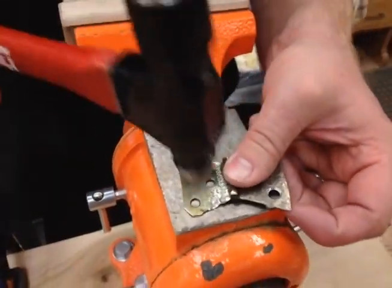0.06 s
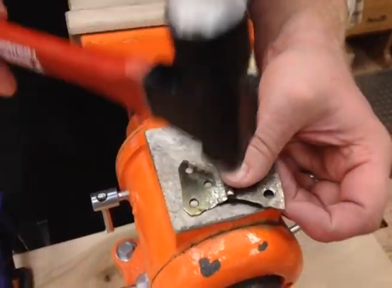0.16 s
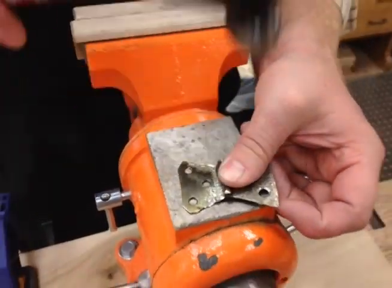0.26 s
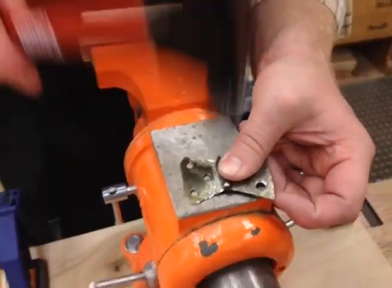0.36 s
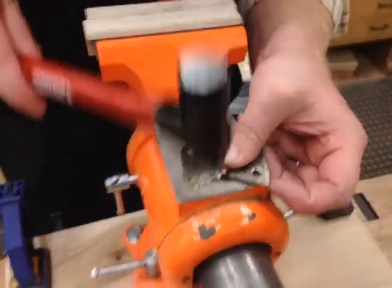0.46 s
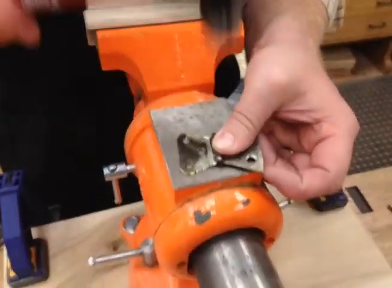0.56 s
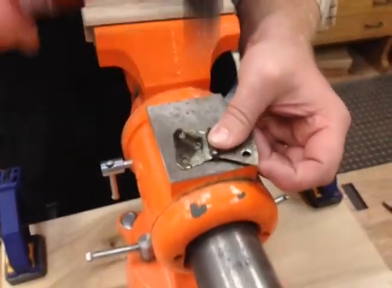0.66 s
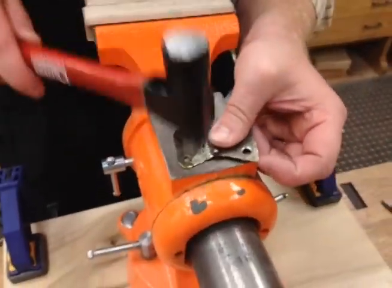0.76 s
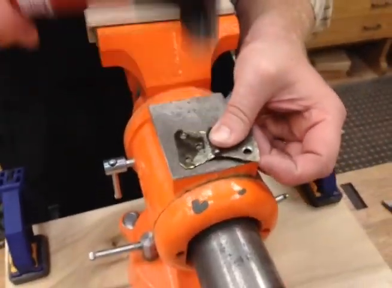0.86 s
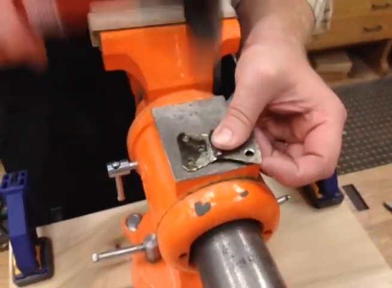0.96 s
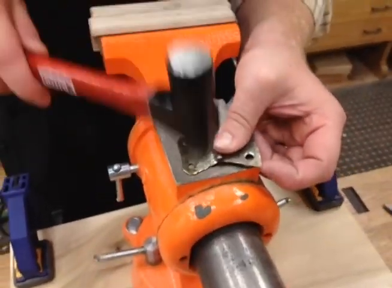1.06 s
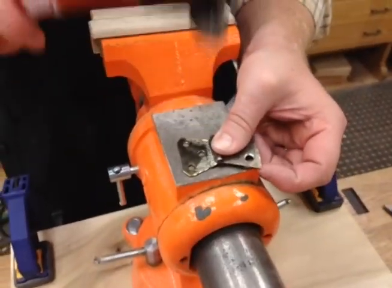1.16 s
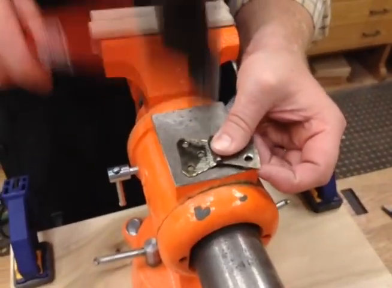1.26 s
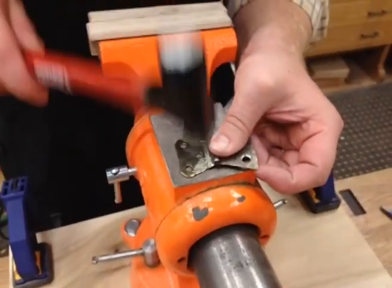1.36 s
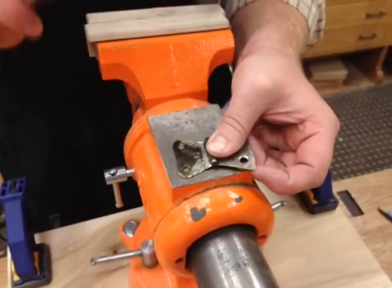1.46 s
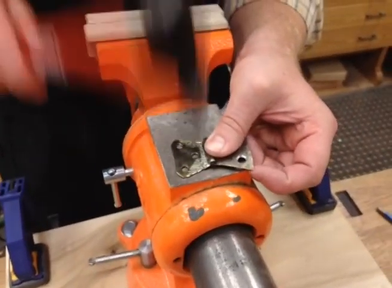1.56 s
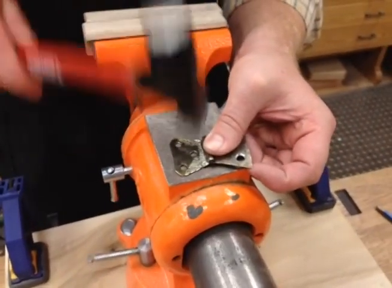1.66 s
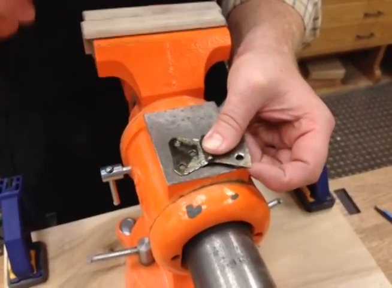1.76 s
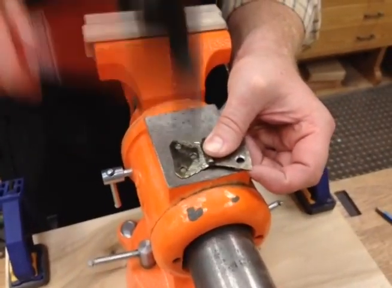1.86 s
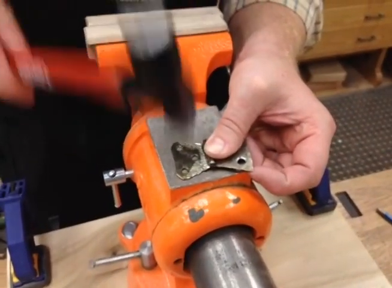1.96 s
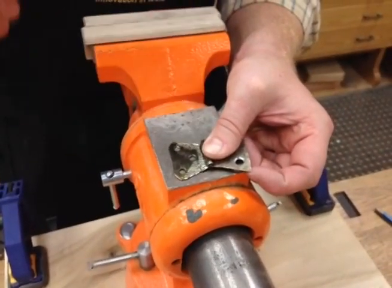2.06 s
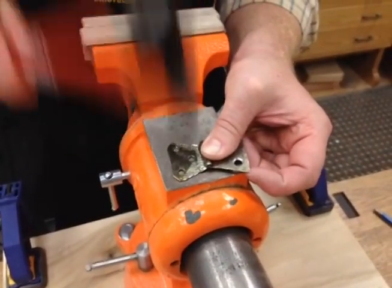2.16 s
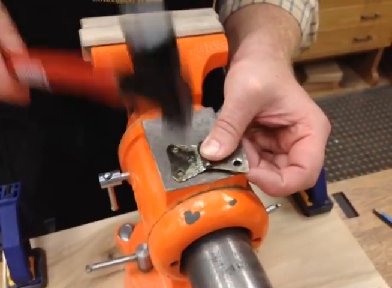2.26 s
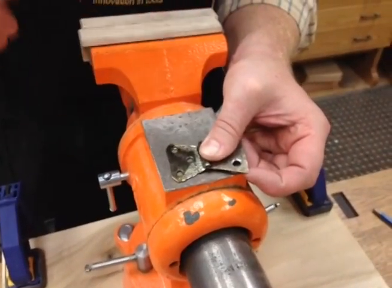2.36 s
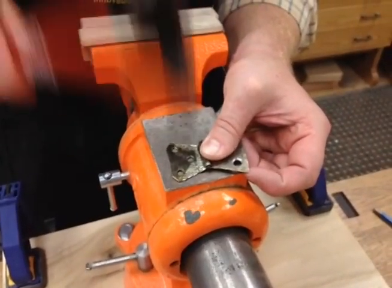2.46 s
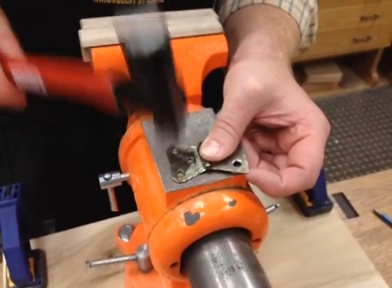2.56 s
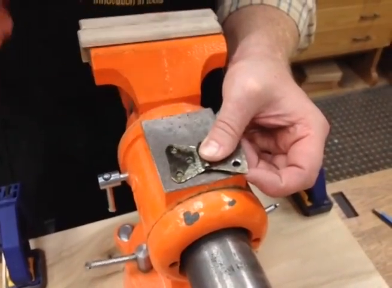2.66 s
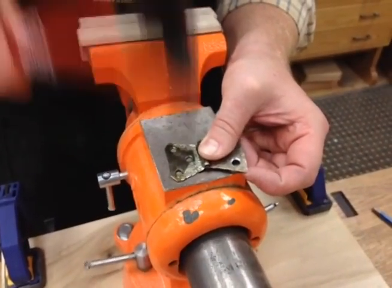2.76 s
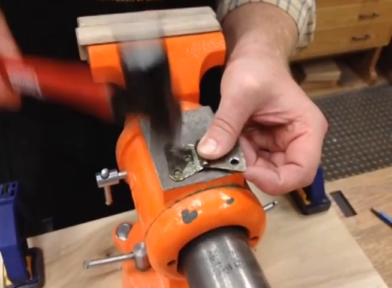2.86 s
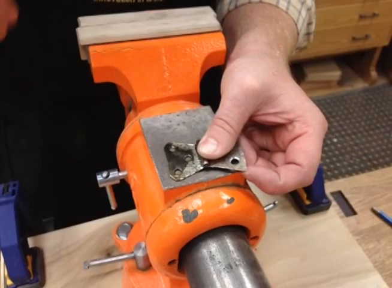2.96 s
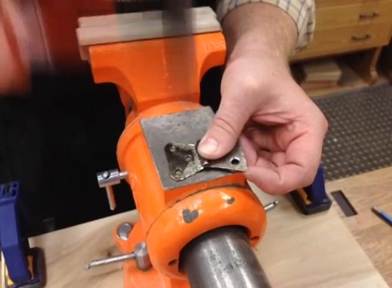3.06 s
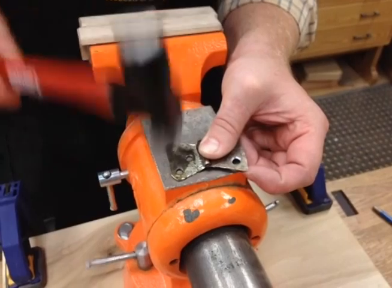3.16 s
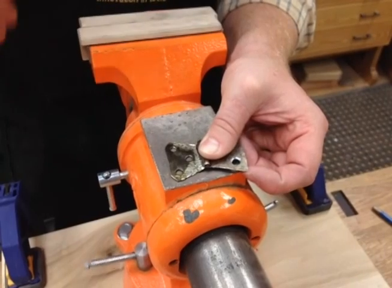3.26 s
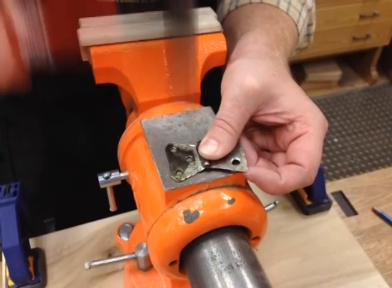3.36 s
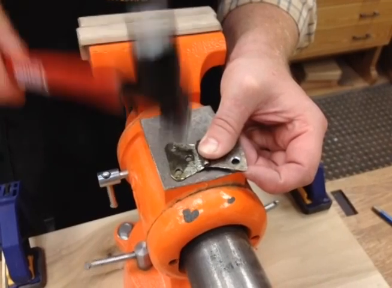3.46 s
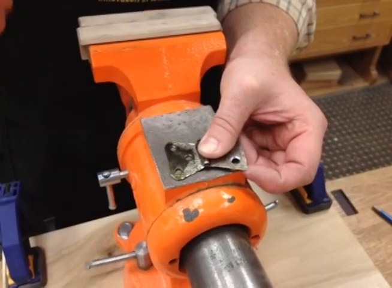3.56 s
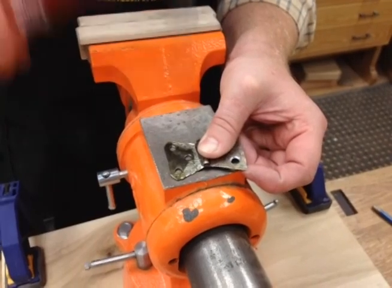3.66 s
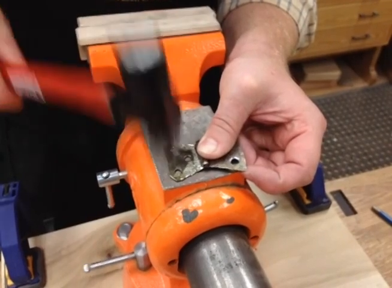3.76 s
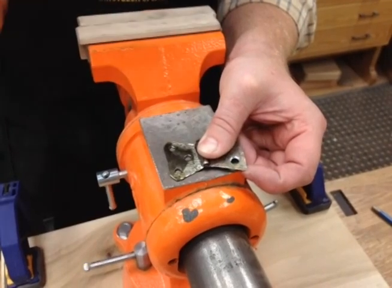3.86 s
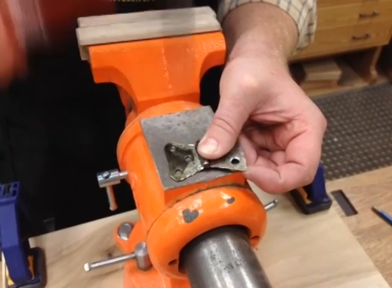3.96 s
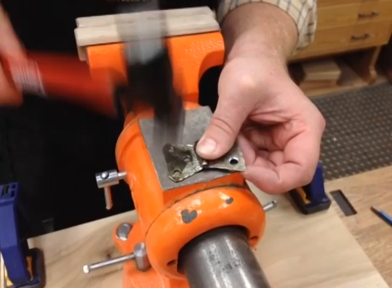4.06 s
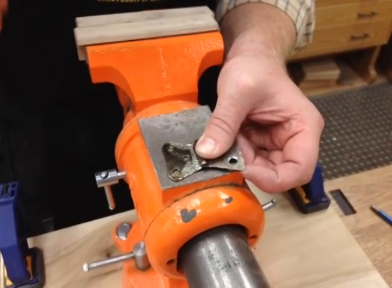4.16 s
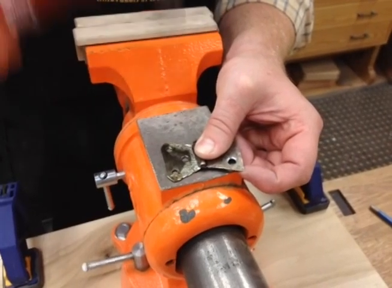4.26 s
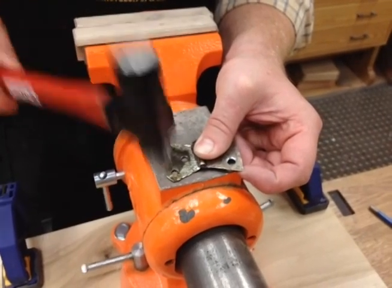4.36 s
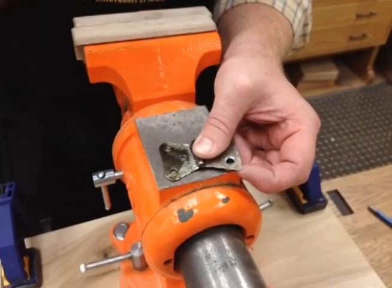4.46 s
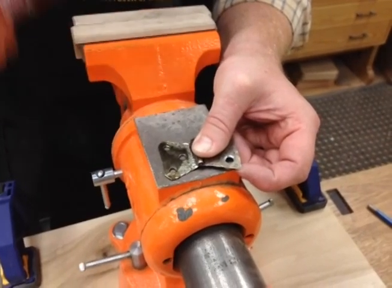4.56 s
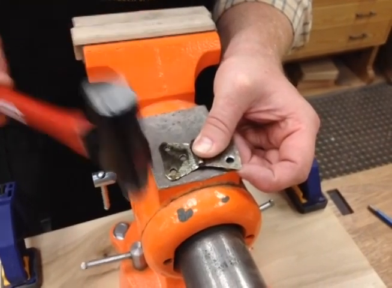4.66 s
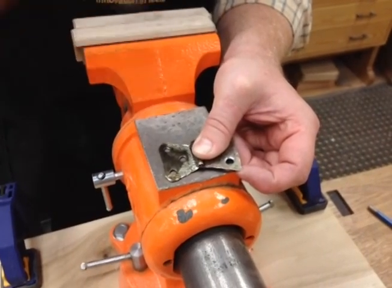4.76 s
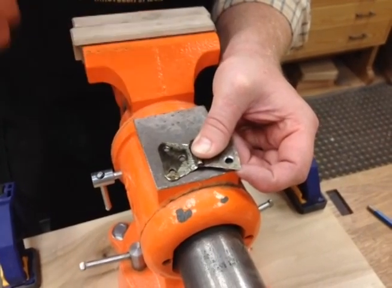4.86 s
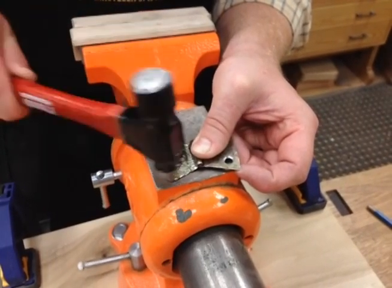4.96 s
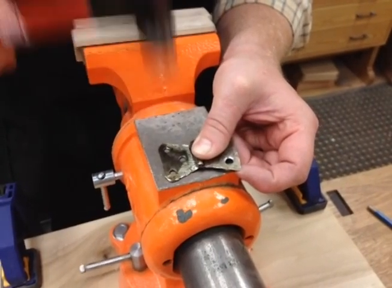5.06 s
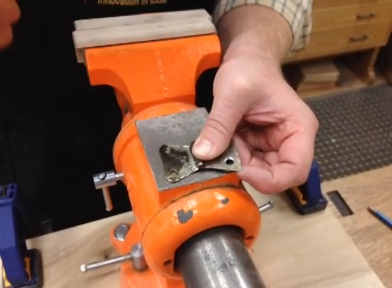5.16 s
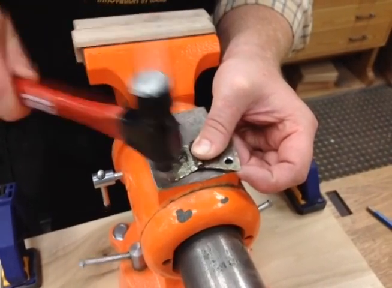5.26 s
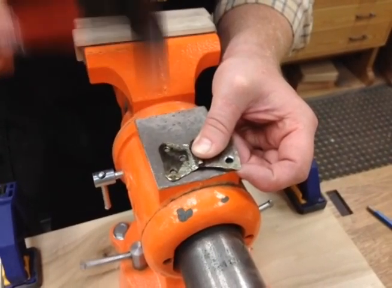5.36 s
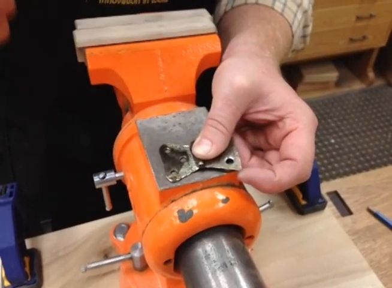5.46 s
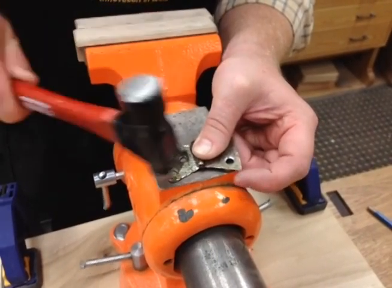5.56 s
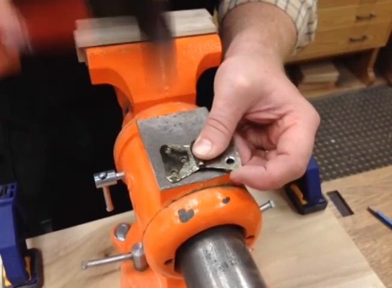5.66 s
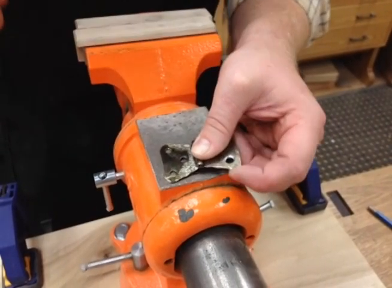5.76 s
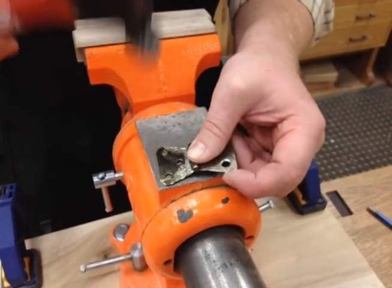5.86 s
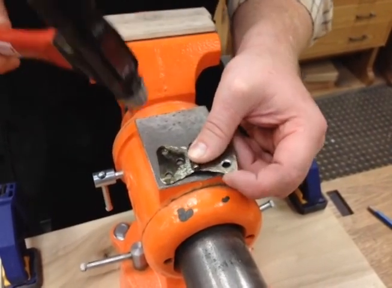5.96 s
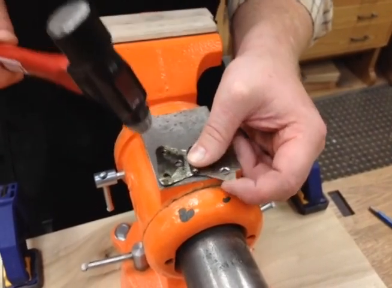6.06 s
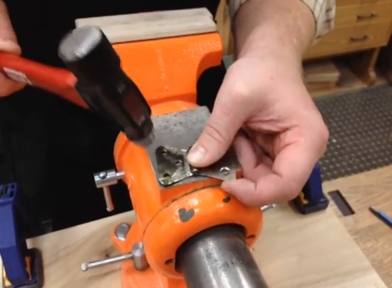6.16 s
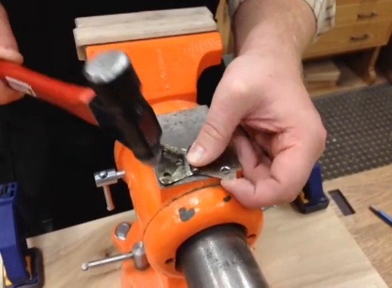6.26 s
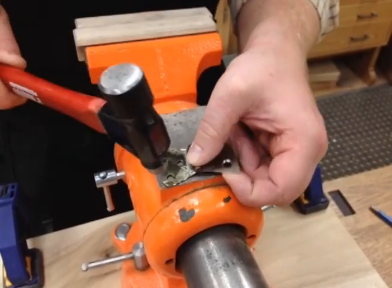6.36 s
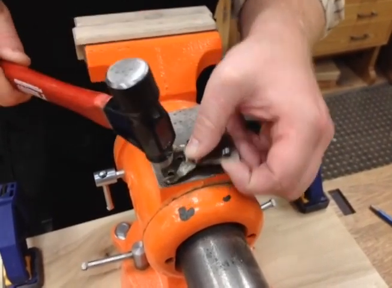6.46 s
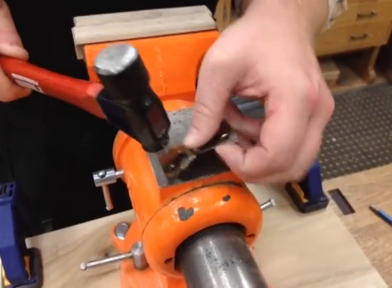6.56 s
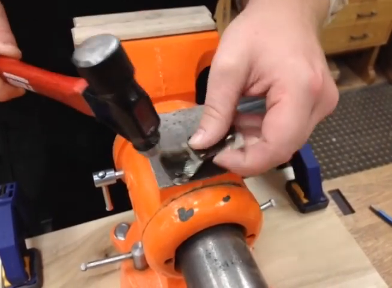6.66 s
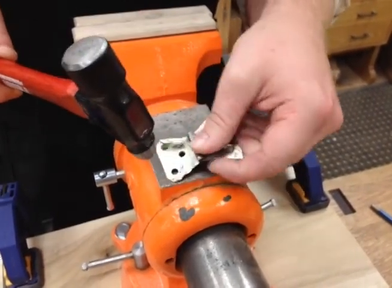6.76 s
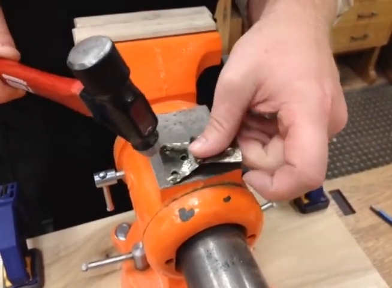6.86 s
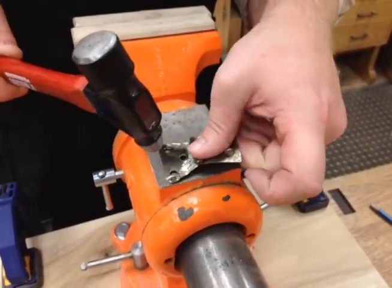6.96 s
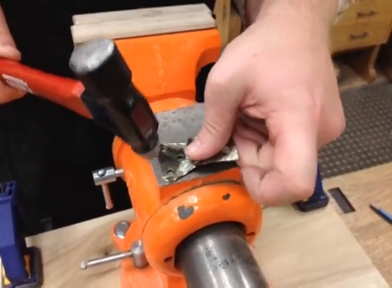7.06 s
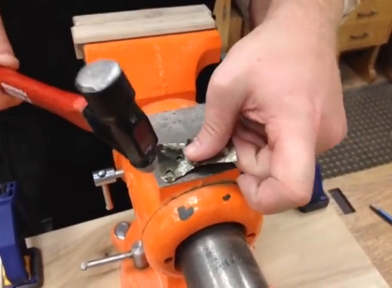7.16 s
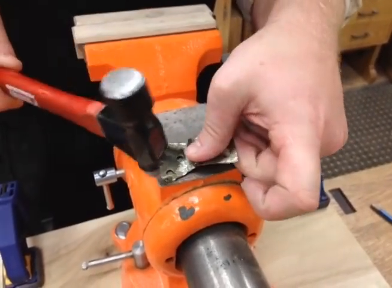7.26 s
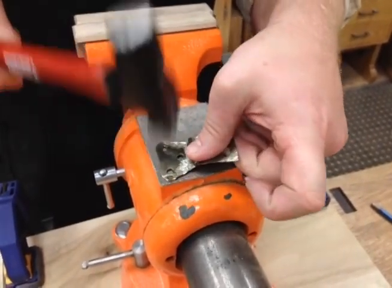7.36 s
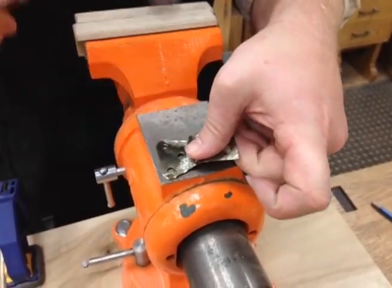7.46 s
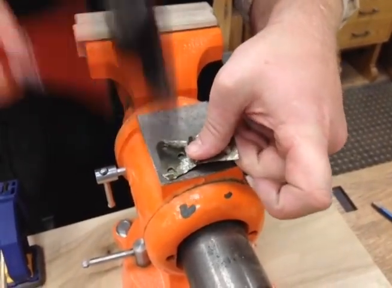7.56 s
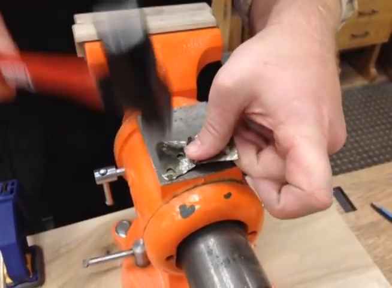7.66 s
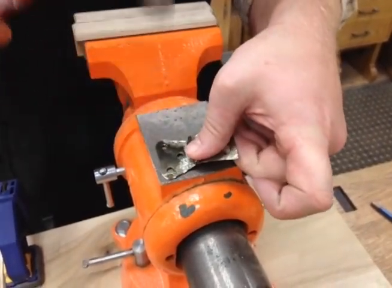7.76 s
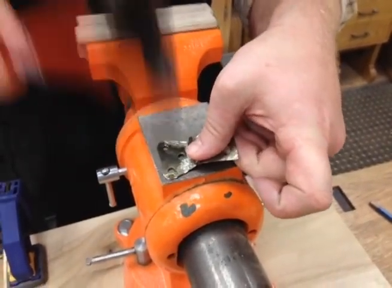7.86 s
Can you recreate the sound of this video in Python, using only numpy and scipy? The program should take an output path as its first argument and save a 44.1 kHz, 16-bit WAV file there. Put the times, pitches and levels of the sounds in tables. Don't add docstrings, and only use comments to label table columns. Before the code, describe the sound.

Steady, very loud hammer blows crack a small brass hinge against a vise anvil, rattling casting and bench, then a pause, scrape, click and one more blow.

```python
import sys
import numpy as np
from scipy import signal
from scipy.fft import rfft, irfft, next_fast_len
from scipy.io import wavfile
from scipy.ndimage import uniform_filter1d, map_coordinates

SR = 44100
rng = np.random.default_rng(int(sys.argv[2]) if len(sys.argv) > 2 else 0)


def nominal_scale(level):
    x = np.asarray(level, float) / 20
    return 10 ** x


def unload_audio(sound):
    columns = np.transpose(np.atleast_2d(sound))
    steps = np.round(np.clip(columns, -1, 1) * 32767)
    wavfile.write(sys.argv[1], SR, steps.astype(np.int16))


N = 349713

# (frequency [Hz], width [Hz], level [dB])
VISE_MODES = [(762, 90, -4.5), (1251, 160, 3), (1435, 270, -2.5), (1727, 59, -8), (2133, 45, 1.5),
              (2323, 65, 1.5), (2913, 180, -1), (3334, 150, -15.5), (3621, 160, 0), (4200, 200, -12.5),
              (4768, 360, -8), (5113, 130, -8), (5790, 200, -8), (8120, 580, -15.5), (10960, 1100, -21)]
REST_S = 6.105
MIC_TOP_HZ = 15350


def along(points, hz):
    f, v = np.transpose(points)
    return np.interp(np.log(hz + 1), np.log(f + 1), v)


def unit(x):
    return x / np.sqrt(np.mean(x ** 2) + 1e-20)


def filtered(x, response):
    m = 2 * next_fast_len(len(x) // 2 + 4096)
    return irfft(rfft(x, m) * response(np.fft.rfftfreq(m, 1 / SR)), m)[:len(x)]


def causal(gain):
    def response(hz):
        c = irfft(np.log(gain(hz) + 1e-6))
        half = len(c) // 2
        folded = np.r_[c[0], 2 * c[1:half], np.zeros(len(c) - half)]
        return np.exp(rfft(folded, 2 * len(hz) - 2))
    return response


def low_cut(hz, corner_hz, order):
    return (1j * hz / (corner_hz + 1j * hz)) ** order


def body(modes, scatter_db=0):
    luck = nominal_scale(scatter_db * rng.standard_normal(len(modes)))

    def response(hz):
        total = 0
        for k, (centre, width, db) in enumerate(modes):
            resonance = 1j * hz * width / (centre * centre - hz * hz + 1j * hz * width)
            total = total + (-1) ** k * luck[k] * nominal_scale(db) * resonance
        return total
    return response


def fade(t, t60):
    return nominal_scale(-60 * t / t60)


def dying_tone(t, hz, db, t60):
    return nominal_scale(db) * fade(t, t60) * np.sin(2 * np.pi * hz * t)


def add(track, s, x):
    part = track[round(s * SR):][:len(x)]
    part += x[:len(part)]


def shop(x, near_db, far_db, spread=None):
    # (frequency [Hz], t60 [s])
    near_decay = [(60, .3), (300, 0.3), (2000, 0.091), (8000, 0.062), (15000, 0.035)]
    # (frequency [Hz], t60 [s])
    far_decay = [(60, 0.77), (300, 0.27), (2000, 0.48), (8000, 0.41), (11000, 0.32), (15500, 0.25)]
    # (frequency [Hz], level [dB])
    wall_colour = [(40, -10.5), (150, 9), (500, -1.5), (1200, 0), (1950, -5), (2200, -3.5), (4000, -6.5),
                   (8600, -1), (9600, -5.5), (11500, 4), (15500, -5)]
    hz, t, z = signal.stft(rng.standard_normal(SR // 2), SR, nperseg=256)
    near = nominal_scale(near_db) * fade(t, along(near_decay, hz)[:, None])
    far = nominal_scale(far_db) * fade(t, along(far_decay, hz)[:, None])
    colour = nominal_scale(along(wall_colour, hz))[:, None]
    tail = signal.istft(z * colour * (near + far), SR, nperseg=256)[1]
    tail = tail * np.clip(np.arange(len(tail)) / SR / 0.0033 - .6, 0, 1)
    wet = signal.fftconvolve(x if spread is None else spread, tail)
    add(wet, 0, x)
    return wet


def fan():
    # (frequency [Hz], rms level [dB])
    hum = [(118.4, -49.5), (236.9, -68.5), (296.1, -55.5), (349.9, -66), (527.6, -55.5), (705.2, -66.5),
           (812.9, -64.5), (1120, -69.5)]
    # (frequency [Hz], level [dB per Hz])
    air_colour = [(18, -72.5), (30, -41.5), (59, -31), (81, -26), (109, -3), (189, -8.5), (295, -15),
                  (404, -13.5), (526, -11.5), (584, -13.5), (2680, -26.5), (9970, -43), (15400, -44),
                  (16500, -72)]
    air_db = -47.5
    t = np.arange(N) / SR

    def slow(rate_hz):
        points = rng.standard_normal(int(N * rate_hz / SR) + 4)
        return map_coordinates(points, [t * rate_hz], order=1)

    out = np.zeros(N)
    for hz, db in hum:
        level = nominal_scale(db + 3.5 + 1.5 * slow(28))
        out += level * np.sin(2 * np.pi * hz * t + .5 * slow(2.2))
    air = unit(filtered(rng.standard_normal(N), lambda hz: nominal_scale(along(air_colour, hz))))
    return out + nominal_scale(air_db + 1.5 + .8 * slow(3.1)) * air


def turn():
    # (frequency [Hz], level [dB], t60 [s])
    turn_modes = [(2960, -13, 0.038), (3700, -4, 0.032), (4680, -6, 0.027), (5560, -2, 0.034),
                  (7310, 4, 0.015), (9900, -18.5, 0.1), (11840, -2.5, 0.065), (13500, -16, .04)]
    turn_s, turn_db = 6.7773, -30
    out, t = np.zeros(N), np.arange(SR // 5) / SR
    ring = sum(dying_tone(t, hz, db, t60) for hz, db, t60 in turn_modes)
    click = 1.16 * rng.standard_normal(len(t)) * fade(t, 0.017)
    direct = nominal_scale(turn_db) * (ring + click)
    spread = nominal_scale(turn_db) * (.25 * ring + click)
    add(out, turn_s, shop(direct, near_db=-39, far_db=-38.5, spread=spread))
    return out


def scrapes():
    # (time [s], length [s], level [dB], lowest frequency [Hz])
    strokes = [(0, 0.53, -68.5, 5220), (0.089, .07, -63.5, 5940), (3.055, 0.0098, -55.5, 9160),
               (5.218, .008, -57.5, 8950), (5.874, .03, -62.5, 8000), (6.105, .013, -24, 3960),
               (6.108, .0025, -14, 6120), (6.1116, .001, -16, 6160), (6.1125, .0025, -12, 6000),
               (6.37, .04, -61, 5990), (6.445, .012, -64, 6100), (6.528, 0.064, -68, 6000),
               (7.126, .05, -69.5, 9000)]
    # (time [s], length [s], level [dB], lowest frequency [Hz])
    drags = [
        (6.621, .03, -52.5, 5000),
        (6.642, 0.07, -44.5, 3500),
        (6.673, .03, -39.5, 3500),
    ]
    # (frequency [Hz], width [Hz], level [dB])
    grit = [(4803, 100, -0.5), (6400, 820, -1.5), (8120, 500, -0.5), (10600, 300, 6.5), (12400, 880, 0.5),
            (13700, 280, 0), (14650, 610, -9)]
    # (frequency [Hz], width [Hz], level [dB])
    brass = [(5100, 600, -1), (6500, 550, 5), (7440, 340, -0.5), (10350, 900, -6), (12960, 1200, -2.5),
             (14000, 900, -4.5)]
    grains_per_s = 2000
    out, t = np.zeros(N), np.arange(SR // 2) / SR
    for (s, length, db, low_hz), metal in [(row, grit) for row in strokes] + [(row, brass) for row in drags]:
        chance = rng.random((2, len(t)))
        sizes = nominal_scale(-3 * np.log(chance[1] + 1e-9))
        grains = (chance[0] < grains_per_s / SR) * sizes
        grains = grains + 0.27 * rng.standard_normal(len(t))
        stroke = np.abs(np.sin(np.pi * np.clip(t / length, 0, 1))) ** 0.55
        ring = body(metal, scatter_db=2)
        sound = filtered(grains * stroke, lambda hz: low_cut(hz, low_hz, 2) * (ring(hz) + nominal_scale(-10.0)))
        sound = unit(sound[:round((length + .01) * SR)])
        add(out, s, shop(nominal_scale(db - 3.0) * sound, near_db=-32, far_db=-53.5))
    return out


def hinge():
    # (time [s], time in the air [s], ring level [dB], side modes under it [dB], landing tick level [dB])
    jumps = [(.764, .072, -37, 0.5, -45), (1.054, 0.057, -33.5, -2, -70), (1.127, 0.014, -41, 1.5, -30.5),
             (1.340, 0.055, -39.5, -10.5, -48), (1.695, 0.0072, -38, -16, -44),
             (1.933, 0.027, -20.5, -15, -48.5), (2.230, .045, -31.5, -3, -46.5),
             (2.533, 0.045, -31, -13, -63), (2.832, 0.084, -31, -17.5, -48),
             (2.937, 0.0092, -23, -13, -19.5), (2.951, .008, -41, -4, -26.5),
             (3.745, 0.031, -25.5, -13, -48.5), (4.046, 0.071, -30.5, -18.5, -43.5),
             (4.352, 0.035, -18, -24, -35), (4.392, 0.015, -29.5, -5, -44),
             (4.658, 0.049, -25.5, -3.5, -33.5), (4.994, .03, -37.5, -2.5, -49.5),
             (5.062, 0.0062, -31, -6.5, -38.5), (5.302, 0.049, -23.5, -17.5, -51.5),
             (5.597, 0.027, -27, -12, -45), (6.107, 0.0047, -67, -3, -23.5), (7.664, 0.042, -31, -6, -40.5)]
    # (frequency [Hz], t60 in the air [s])
    leaf_modes = [(7470, 0.59), (7200, 0.25), (8830, 0.056)]
    buzz_db, buzz_hz = -2.5, 8000
    out, t = np.zeros(N), np.arange(SR // 6) / SR
    for s, air_s, ring_db, side_db, tick_db in jumps:
        levels = ring_db + np.r_[0, side_db + rng.normal(0, 2, 2)]
        choked = fade(np.clip(t - air_s, 0, 1), 0.017)
        tumble = nominal_scale(4.5 * np.interp(t * 150, np.arange(30), rng.standard_normal(30)))
        free = np.clip(t / .002, 0, 1) * choked * tumble
        ring = np.zeros(len(t))
        for db, (hz, t60) in zip(levels, leaf_modes):
            ring += dying_tone(t, hz * rng.normal(1, 0.00074), db + 11.5, t60)
        chatter = filtered(rng.standard_normal(len(t)), lambda hz: low_cut(hz, buzz_hz, 3))
        buzz = nominal_scale(ring_db + side_db + buzz_db) * chatter
        noise = rng.standard_normal(len(t)) * fade(t, 0.014)
        tick = nominal_scale(-15.5) * filtered(noise, body(VISE_MODES))
        tick += filtered(noise, body([(1300, 500, -7.5), (2450, 850, -5.5)]))
        tick += nominal_scale(-23.5) * noise
        sound = free * (ring + buzz) + nominal_scale(tick_db + 22.5) * tick
        add(out, s, shop(sound, near_db=-41.5, far_db=-52.5))
    return out


def hammer():
    # (time [s], strength [dB], how flat the hinge lies [0-1], weight into the bench [dB],
    # ring of the hammer head [dB])
    blows = [(0.45, -1, 0.35, -3.5, -94.5), (0.758, 2, 0.47, 2, -91), (1.048, 1.5, 0.21, -0.5, -89),
             (1.332, 3, 0.5, 0.5, -78), (1.626, 4.5, 0.66, 1, -67.5), (1.928, 4.5, 0.73, 3.5, -62),
             (2.224, 5.5, 0.88, -1, -74.5), (2.527, 6, 0.83, -0.5, -63.5), (2.827, 5.5, 0.87, 1, -55.5),
             (3.132, 6, 1.01, 0, -66), (3.433, 5.5, .9, 3.5, -72.5), (3.743, 6, 0.98, 1.5, -67.5),
             (4.038, 6.5, 1, 6, -74.5), (4.346, 7, 0.99, 1, -70.5), (4.652, 3, 0.54, 2.5, -76),
             (4.988, 5, 0.78, 5.5, -64.5), (5.297, 5, 0.82, 2.5, -56.5), (5.591, 5.5, 0.87, 2.5, -58.5),
             (7.659, 2.5, .5, 0.5, -59.5)]
    # (frequency [Hz], level [dB per Hz])
    crack = [(180, -45), (300, -14.5), (1870, -1), (2360, 1), (3030, -0.5), (3640, -3), (4300, -4),
             (12300, -18.5), (15500, -11.5), (16500, -37.5)]
    # (frequency [Hz], level [dB])
    flat_colour = [(700, -2.5), (1300, -4), (2200, -1), (2900, 0), (3600, 4), (6000, 2.5), (13000, 1.5)]
    # (frequency [Hz], width [Hz], level [dB])
    edge_modes = [(680, 360, -4), (1420, 120, -1), (2240, 120, -3.5), (2770, 350, -3.5), (4530, 110, -13.5),
                  (4650, 110, -16), (5190, 76, -7.5), (5850, 220, -13.5)]
    # (frequency [Hz], level [dB])
    edge_colour = [(300, 8.5), (650, 7), (1350, -7), (1850, -13), (2500, -2), (5000, -2), (8500, -10.5),
                   (11500, 5)]
    # (frequency [Hz], level [dB])
    glance_colour = [(600, -3.5), (1100, -6), (1700, 3.5), (2200, 0), (3000, -4.5), (3700, -0.5),
                     (6000, -6.5), (12000, 4)]
    # (frequency [Hz], width [Hz], level [dB])
    bench = [(62, 25, -17.5), (127.5, 3.9, -12), (197.1, 27, -9), (292, 70, -6.5), (338, 70, -4.5),
             (406, 35, -2), (582, 39, -2.5)]
    # (frequency [Hz], width [Hz], level [dB])
    screw_modes = [(694, 83, 3.5), (1708, 11, 30), (2200, 18, 28)]
    # (frequency [Hz], level [dB], t60 [s])
    head_modes = [(13230, -1, 1.6), (8240, -5, 1.1)]
    # (time [s], level [dB])
    jolts = [
        (2.527, -34),
        (3.431, -33.5),
        (3.741, -28.5),
        (4.038, -30),
        (4.345, -24.5),
        (4.988, -33.5),
        (5.297, -33),
    ]
    edge_until_s, edge_db = .6, -2
    glance_s, glance_screw_db = 4.652, 2
    thump_db = -1
    crush_db, crush_s, crush_shape = -6, .007, 1.5
    fizz_db, fizz_hz, fizz_s = -8.5, 9000, 0.0059
    screw_bent_db, screw_near_db = 7, -10.5
    jolt_hz, jolt_t60_s = 30, 0.037

    out, t, long = np.zeros(N), np.arange(SR // 8) / SR, np.arange(SR) / SR
    contacts = np.sort([row[0] for row in blows] + [REST_S, N / SR])
    impact = 1. * (np.arange(len(t)) == 40)
    late = np.clip(t - .001, 0, 1)
    push = late / 0.0011 * np.exp(1 - late / 0.00063)
    for s, db, flat, weight_db, head_db in blows:
        edge = s < edge_until_s
        glance = abs(s - glance_s) < .01

        def spot_db(hz):
            if edge:
                return along(edge_colour, hz)
            if glance:
                return along(glance_colour, hz)
            return (2 * flat - 1) * along(flat_colour, hz)

        noise = rng.standard_normal((2, len(t))) * np.clip(t / .0009 - 1, 0, 1)
        colour = causal(lambda hz: nominal_scale(along(crack, hz) + spot_db(hz)))
        crush = nominal_scale(crush_db) * filtered(noise[0] * np.exp(-(t / crush_s) ** crush_shape), colour)
        hiss = noise[1] * np.exp(-(t / fizz_s) ** crush_shape)
        fizz = nominal_scale(fizz_db) * filtered(hiss, lambda hz: low_cut(hz, fizz_hz, 4))

        if edge:
            struck = [(hz, w, level + edge_db) for hz, w, level in edge_modes]
        else:
            struck = [(hz, w, level + spot_db(hz)) for hz, w, level in VISE_MODES]
        casting = filtered(nominal_scale(27.0) * impact, body(struck, scatter_db=2.07))
        thump = nominal_scale(thump_db + weight_db) * filtered(push, body(bench, scatter_db=2.57))
        screw_db = screw_bent_db * (.5 - flat) + glance_screw_db * glance
        screw = nominal_scale(screw_db) * filtered(impact, body(screw_modes, scatter_db=2)) * (not edge)

        direct = crush + fizz + casting + thump + nominal_scale(screw_near_db) * screw
        spread = nominal_scale(27.5) * filtered(impact, colour) + nominal_scale(-19.5) * casting + nominal_scale(-5.5) * thump + screw
        blow = shop(direct, near_db=-35.0, far_db=-47.0, spread=spread)
        add(out, s - .0012, nominal_scale(db + 10.5) * blow)

        ring = sum(dying_tone(long, hz, head_db + 11 + level, t60) for hz, level, t60 in head_modes)
        swing = nominal_scale(4 * np.interp(long * 25, np.arange(26), rng.standard_normal(26)))
        add(out, s, ring * swing * (long < contacts[contacts > s][0] - s))
    for s, db in jolts:
        add(out, s, dying_tone(t, jolt_hz, db + 25, jolt_t60_s))
    return out


def scene():
    return (fan() + turn() + scrapes() + hinge() + hammer())[None]


def ducking(x, depth_db=11, recover_s=1.0, attack_s=.006, shape=0.84):
    t = np.arange(N) / SR
    loud = np.abs(uniform_filter1d(x, 9)) > .45
    last = np.maximum.accumulate(np.where(loud, t, -99))
    gain_db = -depth_db * np.exp(-((t - last) / recover_s) ** shape)
    pole = np.exp(-1 / (attack_s * SR))
    return nominal_scale(signal.lfilter([1 - pole], [1, -pole], gain_db))


def low_pass(x):
    return signal.sosfilt(signal.butter(12, 16360, fs=SR, output="sos"), x)


def record(dry):
    x = filtered(dry[0], causal(lambda hz: nominal_scale(-40 * np.clip((hz - MIC_TOP_HZ) / 300, 0, 1))))
    x = x * ducking(x)
    x = x / (1 + np.abs(x / .99) ** 8) ** (1 / 8)
    x = filtered(x, lambda hz: low_cut(hz, 30, 2) * nominal_scale(-20 * np.clip((hz - MIC_TOP_HZ) / 1000, 0, 1)))
    mix = np.clip(x, -1, 1)[None]
    return low_pass(mix)


dry = scene()
out = record(dry)
unload_audio(out)
```